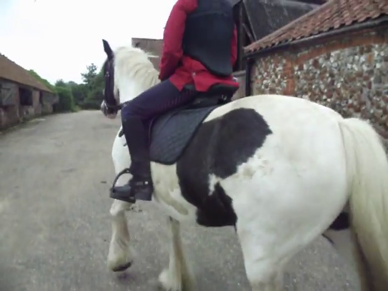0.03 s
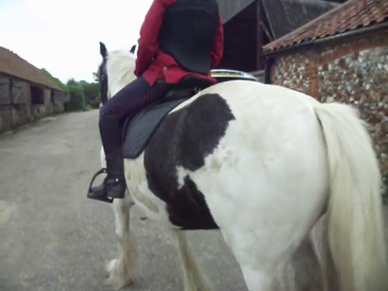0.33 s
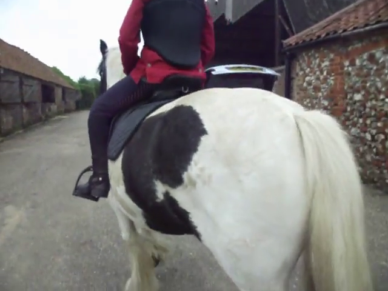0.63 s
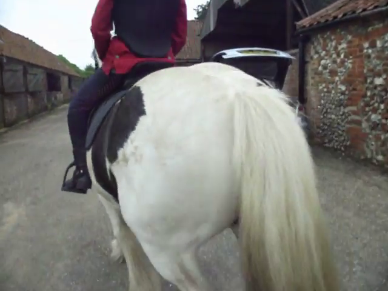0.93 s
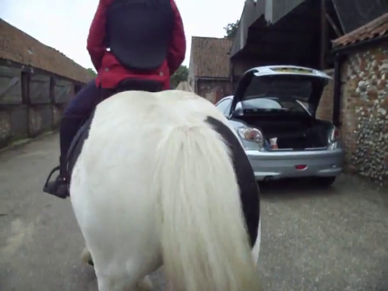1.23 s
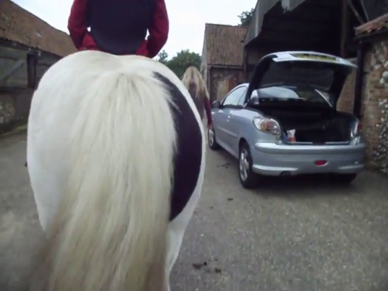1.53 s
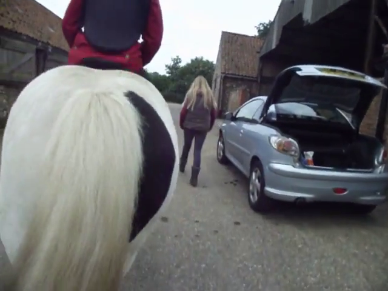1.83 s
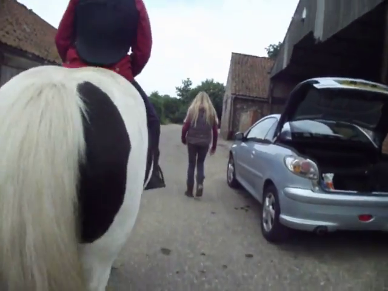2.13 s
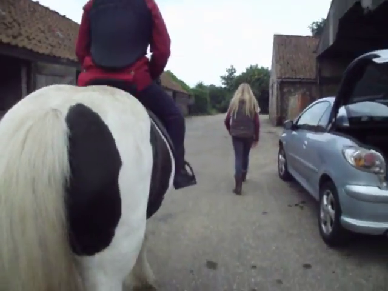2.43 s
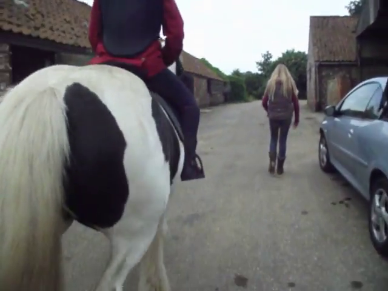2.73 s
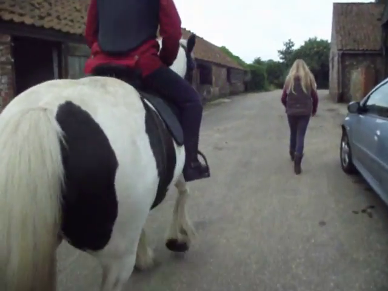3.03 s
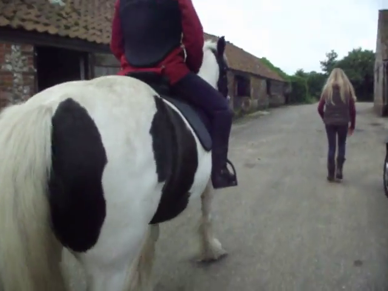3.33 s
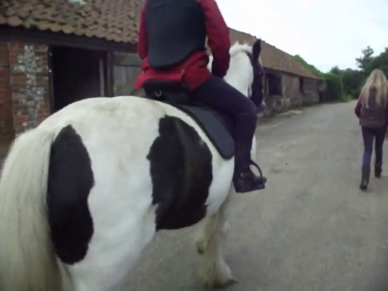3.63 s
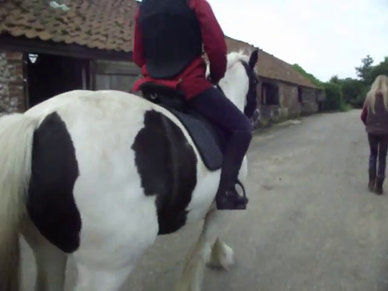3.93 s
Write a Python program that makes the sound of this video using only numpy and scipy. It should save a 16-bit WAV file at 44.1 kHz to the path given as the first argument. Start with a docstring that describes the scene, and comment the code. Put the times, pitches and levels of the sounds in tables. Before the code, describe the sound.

A horse's hooves clop steadily on gritty paving over a low wind rumble.

```python
"""Hoofbeats over a low wind rumble: a shod horse walks past close by on a gritty paved farmyard.
Each footfall is a thud, a hollow clop and the clack of the shoe; hind hooves loud, fore hooves softer.
Grit snaps and scrapes under the shoes as the horse turns, and barn walls answer briefly.
The wind buffets a small narrow-band microphone, and the hardest blows overload it."""
import sys
import numpy as np
from scipy import signal
from scipy.fft import rfft, irfft
from scipy.io import wavfile
from scipy.ndimage import uniform_filter1d

SR = 44100
rng = np.random.default_rng(int(sys.argv[2]) if len(sys.argv) > 2 else 0)


def file_out(sig):
    """Save sig as 16-bit WAV at sys.argv[1]."""
    # one column per channel
    cols = np.atleast_2d(sig).T
    # limit, then scale
    lim = np.clip(cols, -1, 1)
    pcm = np.round(lim * 32767).astype(np.int16)
    wavfile.write(sys.argv[1], SR, pcm)


N = 176400
HIT_T = np.arange(SR // 8) / SR  # time axis of one short event, s


def undb(db):
    """Decibels to gain."""
    return 10 ** (np.asarray(db) / 20)


def level(x, db):
    """Set the rms level."""
    return x * undb(db) / np.sqrt(np.mean(x ** 2))


def blow(x, db):
    """Give a short sound the energy of 5 ms at this level."""
    return x * undb(db) / np.sqrt(np.sum(x ** 2) / (.005 * SR))


def add(out, start_s, x):
    """Mix x in at start_s."""
    i = max(int(start_s * SR), 0)
    out[i:i + len(x)] += x[:max(N - i, 0)]


def colour(x, points):
    """Shape a sound by (Hz, dB) points."""
    hz, db = np.array(points).T
    bins_hz = np.fft.rfftfreq(len(x), 1 / SR) + 1e-3
    return irfft(rfft(x) * undb(np.interp(np.log(bins_hz), np.log(hz), db)), len(x))


def contour(points):
    """Level in dB at each sample, from (s, dB) points."""
    return np.interp(np.arange(N) / SR, *np.array(points).T)


def wander(rate_hz):
    """Smooth random drift with a spread near 1."""
    step = int(SR / rate_hz)
    return uniform_filter1d(np.repeat(rng.standard_normal(N // step + 1), step), step)[:N]


def grains(size=len(HIT_T), spread=.43):
    """A dense train of tiny clicks of very unequal strength."""
    click, strength, gate = rng.standard_normal((3, size))
    return click * np.exp(spread * strength) * (gate > 1)


def attack(rise_s):
    """Exponential rise to 1."""
    return 1 - np.exp(-HIT_T / rise_s)


def swell(length_s):
    """A rounded rise and fall."""
    return np.sqrt(np.abs(np.sin(np.pi * np.minimum(HIT_T / length_s, 1))))


def ring(modes, scatter=.03):
    """Damped (Hz, T60 s, dB) modes, slightly detuned at every blow."""
    return sum(undb(db) * np.sin(2 * np.pi * hz * (1 + scatter * rng.standard_normal()) * HIT_T)
               * undb(-60 * HIT_T / t60_s) for hz, t60_s, db in modes)


def strike(modes, settle_s):
    """A gritty contact dies away and rings the modes."""
    contact = grains() * np.exp(-HIT_T / settle_s)
    return signal.fftconvolve(contact, ring(modes))[:len(HIT_T)]


def rub(hz, length_s, width_ratio):
    """Clicks through one resonance, swelling and fading."""
    b, a = signal.iirpeak(hz, 1 / width_ratio, fs=SR)
    return level(signal.lfilter(b, a, grains()), 0) * swell(length_s)


# Spectrum of distant air and trees. Each row: frequency in Hz, gain in dB.
AIR_SPECTRUM = [(120, -39), (200, -2.5), (257, -4.5), (389, -7.5), (566, -10), (846, -11), (1540, -11),
                (1760, -8), (1940, -6), (2260, -9.5), (2990, -17), (5130, -7.5), (5500, -4.5), (7150, -59),
                (12100, -120)]


def yard_air():
    """Distant air and trees: a faint, wavering noise."""
    air = level(colour(rng.standard_normal(N), AIR_SPECTRUM), db=-39.5)
    return air * undb(2.4 * wander(rate_hz=38))


# Wind rumble spectrum. Each row: frequency in Hz, gain in dB.
WIND_SPECTRUM = [(8, 0.5), (18, 5.5), (30, -3), (50, -3), (80, -14.5), (130, -20), (250, -31.5),
                 (500, -58.5), (1500, -67)]
# Gust contour. Each row: time in seconds, level in dB.
GUSTS = [(0.0, -26.5), (0.08, -29.5), (0.34, -29.5), (0.42, -19.5), (0.46, -33), (0.62, -19.5),
         (0.76, -36.5), (0.81, -26), (1.05, -31), (1.08, -25), (1.11, -31), (1.2, -37.5), (1.8, -13),
         (1.83, -22.5), (2.36, -30.5), (2.38, -24.5), (2.64, -37), (2.8, -16), (2.84, -27), (2.95, -17.5),
         (2.97, -25.5), (3.12, -16.5), (3.16, -25), (3.43, -38.5), (3.46, -27), (3.79, -23.5), (3.84, -32),
         (4.0, -30)]


def wind():
    """Gusts rumble and flutter on the microphone."""
    rumble = level(colour(rng.standard_normal(N), WIND_SPECTRUM), 0)
    flutter_db = .6 * wander(rate_hz=22.36)
    return rumble * undb(contour(GUSTS) + flutter_db)


# Low bumps. Each row: start in seconds, length in seconds, level before the low-pass in dB, pitch in Hz.
BUMPS = [(0.406, 0.026, -37, 200), (0.903, 0.028, -35, 250), (1.003, 0.019, -30, 260),
         (1.766, 0.039, -29, 223), (2.078, 0.037, -29.5, 340), (2.615, 0.038, -33, 230),
         (3.102, 0.077, -29, 110)]


def bumps():
    """Saddle and wind make a few soft, low bumps."""
    out = np.zeros(N)
    lowpass = signal.butter(2, 600, fs=SR, output="sos")
    for start_s, length_s, db, hz in BUMPS:
        add(out, start_s, undb(db) * signal.sosfilt(lowpass, rub(hz, length_s, width_ratio=.31)))
    return out


def walls(x):
    """Quick reflections from ground and barns, then a faint open-air tail."""
    t = np.arange(SR) / SR
    lag_s = .0035
    build_up = 1 - np.exp(-(t / lag_s) ** 2)
    response = np.zeros(SR)
    for db, t60_s in ((-12, .16), (-16.5, .55)):
        tail = rng.standard_normal(SR) * undb(-60 * t / t60_s) * build_up
        response += undb(db) * tail / np.linalg.norm(tail)
    return signal.fftconvolve(x, response)[:N]


# Grit spectrum, shared by crunch, scuffs and snaps. Each row: frequency in Hz, gain in dB.
GRIT_SPECTRUM = [(150, -16), (700, -14), (1500, -10), (2200, -6), (2900, 2), (3400, -4), (4000, -25.5),
                 (5500, -20.5)]
# Crunch contour. Each row: time in seconds, level in dB.
CRUNCH = [(0, -44), (.7, -42.5), (1.0, -40), (1.5, -43.5), (1.9, -39.5), (2.1, -36), (2.25, -28.5),
          (2.42, -30.5), (2.47, -39), (2.65, -34.5), (2.8, -33.5), (2.86, -47), (3.04, -36.5), (3.42, -41),
          (3.6, -38), (3.8, -33.5), (4, -42)]


def crunch():
    """Fine grit crunches unevenly as the hooves turn."""
    grit = level(colour(grains(N, spread=.5), GRIT_SPECTRUM), 0)
    flicker_db = wander(rate_hz=65)
    shuffle_db = 2.4 * wander(rate_hz=20)
    return grit * undb(contour(CRUNCH) + flicker_db + shuffle_db)


# Shoe slides. Each row: start in seconds, length in seconds, scrape level in dB, resonance in Hz,
# resonance level in dB.
SCUFFS = [(0.449, .02, -35, 980, -39.5), (0.487, .008, -51, 1250, -30.5), (1.097, 0.009, -26, 1094, -24),
          (1.114, 0.025, -18, 1000, -21.5), (1.606, 0.012, -43, 1110, -33.5),
          (1.71, 0.032, -37, 1000, -21.5), (1.838, 0.0057, -40, 1900, -28.5),
          (2.034, 0.063, -51, 2000, -30), (2.295, .012, -33.5, 1010, -22), (2.303, 0.032, -50, 950, -27),
          (2.386, 0.0067, -29, 1150, -17.5), (2.398, 0.03, -25, 1520, -19),
          (2.434, 0.017, -23.5, 1550, -20), (2.657, 0.018, -22.5, 2000, -20),
          (2.722, 0.012, -36, 2600, -23), (2.773, 0.032, -41, 2800, -33), (3.018, 0.035, -35, 3680, -34),
          (3.169, 0.011, -26.5, 2300, -30.5), (3.518, 0.0088, -24, 1000, -15.5),
          (3.724, 0.011, -25.5, 2100, -41), (3.841, 0.0078, -16, 2900, -21),
          (3.91, 0.0087, -29, 2180, -32.5)]


def scuffs():
    """A sliding shoe scrapes the grit and excites one resonance."""
    out = np.zeros(N)
    for start_s, length_s, scrape_db, body_hz, body_db in SCUFFS:
        scrape = level(colour(grains(), GRIT_SPECTRUM), scrape_db) * swell(length_s)
        body = undb(body_db) * rub(body_hz, length_s, width_ratio=.25)
        add(out, start_s, scrape + body)
    return out


# Snapping grit. Each row: start in seconds, pitch in Hz, ping level in dB.
SNAPS = [(0.1981, 2600, -10), (.2202, 2680, -15), (0.5108, 2850, -13), (0.5292, 3180, -19),
         (1.109, 2896, -14), (1.125, 2750, -18.5), (1.2170, 2870, -29), (1.9720, 2840, -27.5),
         (2.124, 3360, -14.5), (2.132, 3080, -19), (2.25, 2740, -21), (2.28, 2960, -7.5),
         (2.3948, 2760, -12), (2.4009, 2670, -16), (2.4361, 2970, -12.5), (2.445, 2760, -14),
         (2.4500, 2470, -25), (2.5020, 2320, -20), (2.8430, 2500, -25), (3.38, 3000, -30),
         (3.7268, 2300, -29), (3.8350, 2850, -10)]


def snaps():
    """Single stones crack under a shoe: a bright ping and a puff of splinters."""
    ping_t60_s, splinter_decay_s = .0054, .00076
    out = np.zeros(N)
    for start_s, hz, db in SNAPS:
        ping = ring([(hz, ping_t60_s, 0)], scatter=.002) * attack(rise_s=.0006)
        splinters = colour(rng.standard_normal(len(HIT_T)), GRIT_SPECTRUM)
        splinters *= np.exp(-HIT_T / splinter_decay_s)
        add(out, start_s, blow(ping, db) + blow(splinters, db - 11.5))
    return out


# Modes of the shoe's clack and of its ring. Each row: frequency in Hz, T60 in seconds, gain in dB.
CLACK_MODES = [(1250, 0.0027, -1), (1720, 0.02, -8.5), (2003, 0.036, -7), (2480, 0.0034, 6)]
RING_MODES = [(2500, 0.026, 7), (2858, 0.0092, 23.5), (3180, .008, -9), (3650, 0.0013, -17.5)]


def shoe(settle_s, clack_db, ring_db):
    """The shoe clacks and rings as it settles on the paving."""
    return blow(strike(CLACK_MODES, settle_s), clack_db) + blow(strike(RING_MODES, settle_s), ring_db)


# Modes of the hoof's thud. Each row: frequency in Hz, T60 in seconds, gain in dB.
THUD_MODES = [(164, 0.014, -4), (269, 0.019, 0), (390, 0.005, -5.5), (590, .008, -10)]
# Modes of the hollow under the sole. Each row: multiple of the clop pitch, T60 in seconds, gain in dB.
HOLLOW_MODES = [(1.0, .017, 8.5), (.76, 0.0089, -2.5), (1.2, 0.0067, -11.5)]
# Footfalls. Each row: start in seconds, clop pitch in Hz, levels of clop, thud, clack and shoe ring
# in dB, shoe settling time in seconds, toe brush in dB relative to the blow.
FOOTFALLS = [(0.166, 737, -12, -22.5, -28.5, -24.5, .002, -18),
             (0.5092, 837, -22, -26.5, -13.5, -14, 0.0038, -10),
             (0.7817, 975, -26.5, -37, -20.5, -43, 0.015, -6.5),
             (1.1105, 980, -6.5, -12.5, -21, -26.5, 0.0035, -25.5),
             (1.4004, 900, -17.5, -34, -35.5, -30.5, .004, -16),
             (1.7053, 850, -12, -17.5, -13.5, -18, 0.0057, -16.5),
             (1.9880, 813, -31.5, -33, -17.5, -22.5, 0.016, -7.5),
             (2.2774, 952, -8.5, -30, -10.5, -12, 0.0022, -23.5),
             (2.576, 724, -28, -30, -20.5, -22, 0.0036, -6), (2.8779, 1063, -8, -24, -9, -12, 0.014, -42),
             (3.1970, 810, -17, -30, -17.5, -18, 0.0029, -20.5),
             (3.4995, 665, -18.5, -29.5, -10, -19, 0.0071, -32),
             (3.5051, 885, -12, -18, -8.5, -10.5, 0.0016, -35),
             (3.8130, 790, -24.5, -29, -19, -33, 0.0037, -11)]


def hooves():
    """The toe brushes, the hoof strikes and pumps the hollow under the sole, the heel follows softly."""
    toe_lead_s, toe_settle_s = .004, .0013
    heel_lag_s, heel_settle_s, heel_db = .017, .005, -12.5
    out = np.zeros(N)
    for start_s, clop_hz, clop_db, thud_db, clack_db, ring_db, settle_s, toe_db in FOOTFALLS:
        hollow = [(clop_hz * multiple, t60_s, db) for multiple, t60_s, db in HOLLOW_MODES]
        clop = blow(ring(hollow, scatter=.0015) * attack(rise_s=.00038), clop_db)
        thud = blow(ring(THUD_MODES) * attack(rise_s=.00057), thud_db)
        toe = shoe(toe_settle_s, clack_db, ring_db) + blow(strike(hollow, toe_settle_s), clop_db)
        heel = shoe(heel_settle_s, clack_db, ring_db)
        heel += blow(strike(hollow, heel_settle_s), clop_db - 5)
        heel += blow(strike(THUD_MODES, heel_settle_s), thud_db + 4)
        add(out, start_s - toe_lead_s, undb(toe_db) * toe)
        add(out, start_s, clop + thud + shoe(settle_s, clack_db, ring_db))
        add(out, start_s + heel_lag_s, undb(heel_db) * heel)
    return out


def scene():
    """The horse and its reflections over yard air, wind and bumps; mono."""
    horse = hooves() + snaps() + crunch() + scuffs()
    return (horse + yard_air() + walls(horse) + wind() + bumps())[None]


# Treble roll-off of the microphone. Each row: frequency in Hz, gain in dB.
MIC_RESPONSE = [(3000, -1), (3700, -3), (4300, -5.5), (5100, -9.5), (5500, -17.5), (6000, -14)]
# Treble dip after clipping. Each row: frequency in Hz, gain in dB.
CLIP_SOFTENING = [(4800, 0), (6300, -6), (9000, -4), (14000, -1.5)]


def record(dry):
    """A narrow-band microphone clips the loudest peaks; a treble dip softens their harsh edge."""
    mic_top_hz, output_top_hz, clip_level = 5800, 16000, .71
    mic_lowpass = signal.cheby1(12, .3, mic_top_hz, fs=SR, output="sos")
    output_lowpass = signal.ellip(8, .2, 70, output_top_hz, fs=SR, output="sos")
    narrow = signal.sosfilt(mic_lowpass, colour(dry[0], MIC_RESPONSE))
    clipped = np.clip(narrow, -clip_level, clip_level)
    return signal.sosfilt(output_lowpass, colour(clipped, CLIP_SOFTENING))[None]


dry = scene()
out = record(dry)
file_out(out)
```